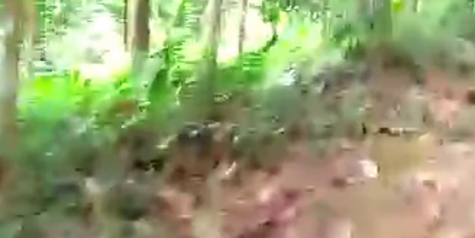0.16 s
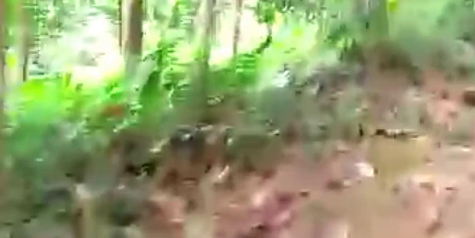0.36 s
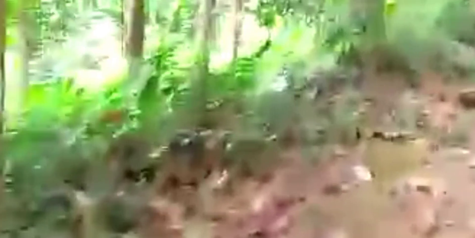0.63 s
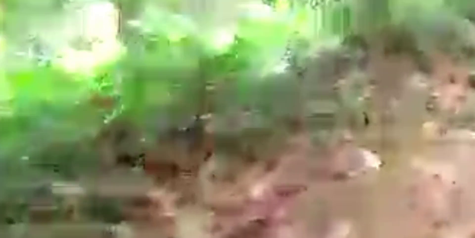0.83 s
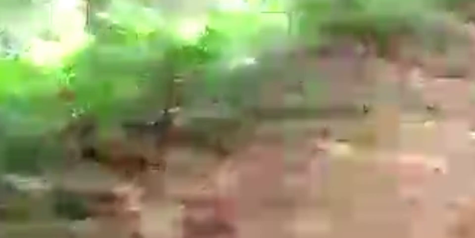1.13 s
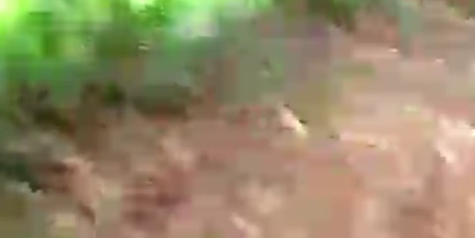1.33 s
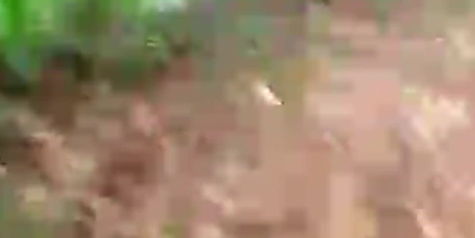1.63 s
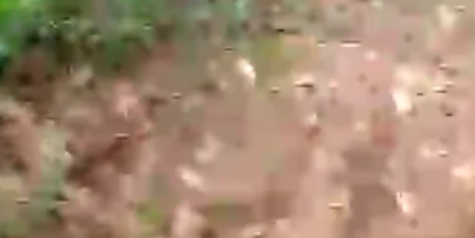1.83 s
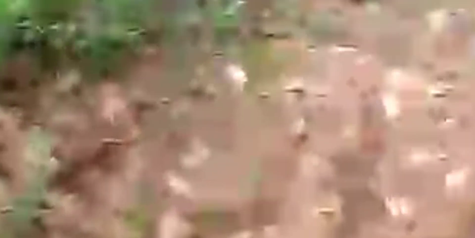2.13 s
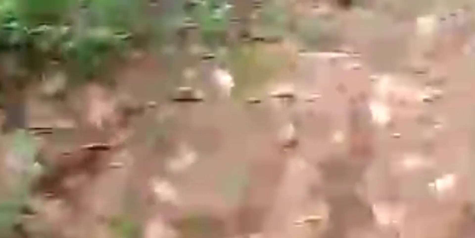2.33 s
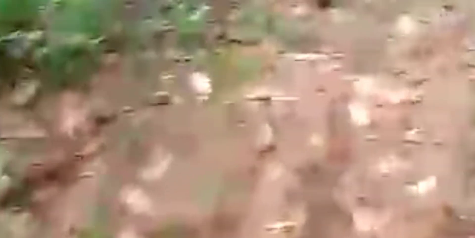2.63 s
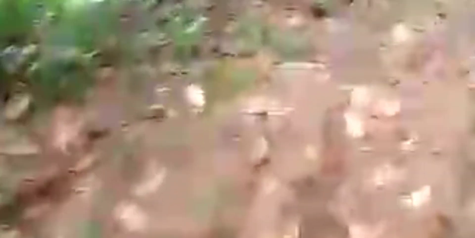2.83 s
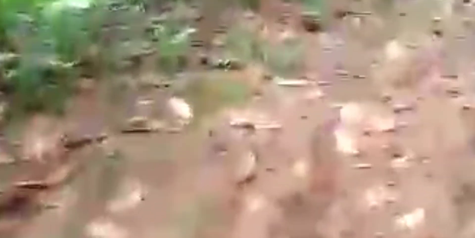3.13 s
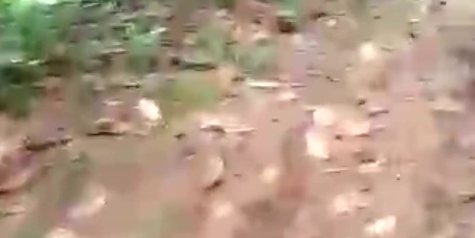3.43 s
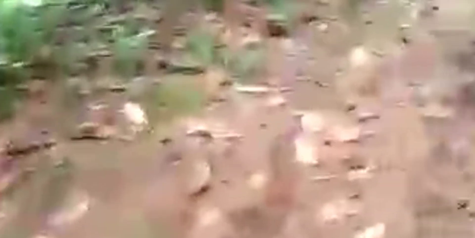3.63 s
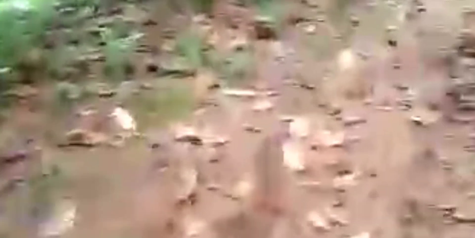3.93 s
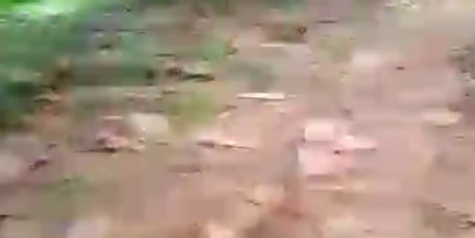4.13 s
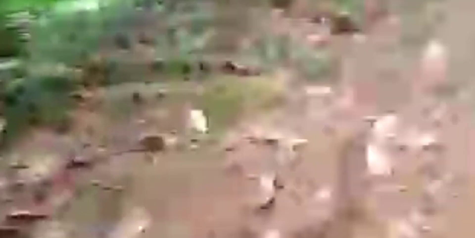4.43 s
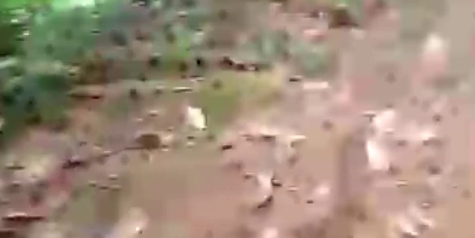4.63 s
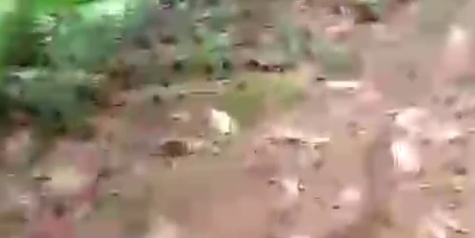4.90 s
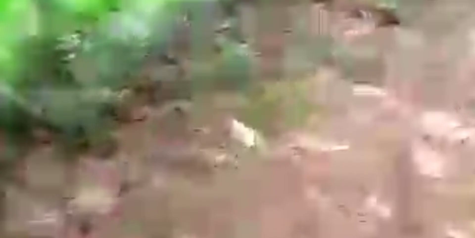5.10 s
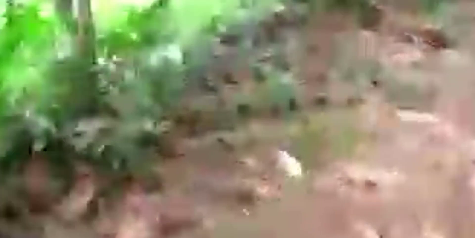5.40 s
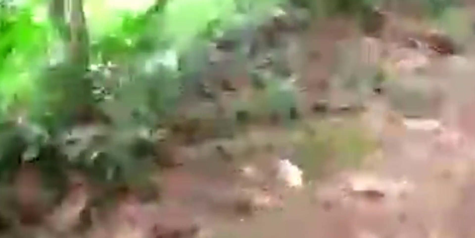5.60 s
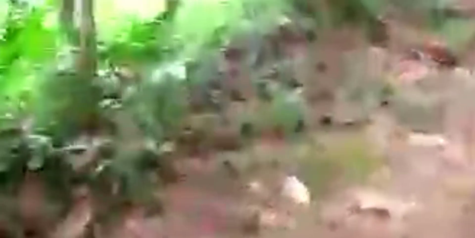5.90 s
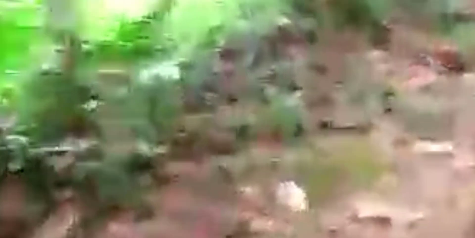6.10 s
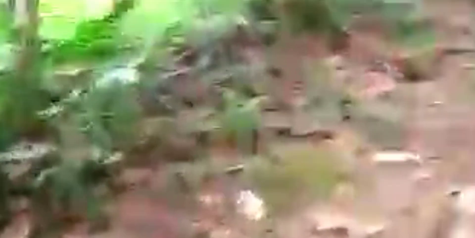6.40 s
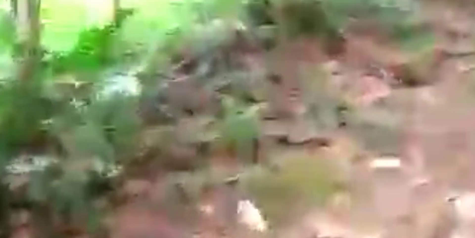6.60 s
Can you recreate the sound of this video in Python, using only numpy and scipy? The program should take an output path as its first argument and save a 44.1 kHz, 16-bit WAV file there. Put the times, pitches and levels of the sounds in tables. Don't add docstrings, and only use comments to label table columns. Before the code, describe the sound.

Birdsong among echoing trees: two loud falling whistles, growing upward whip notes, a quick even trill, scattered pips and burry warbles over faint hiss.

```python
import sys
import numpy as np
from scipy import signal
from scipy.fft import rfft, irfft, next_fast_len
from scipy.io import wavfile
from scipy.ndimage import uniform_filter1d

SR = 44100
rng = np.random.default_rng(int(sys.argv[2]) if len(sys.argv) > 2 else 0)


def generate_wav(signal):
    frames = np.transpose(np.atleast_2d(signal))
    scaled = np.clip(frames, -1, 1) * 32767
    pcm = np.round(scaled).astype(np.int16)
    wavfile.write(sys.argv[1], SR, pcm)


def level_to_linear(level):
    exponent = np.asarray(level, float) / 20
    return 10 ** exponent


N = 297675
LEAD_S = 0.7


def silence():
    return np.zeros(N + int(LEAD_S * SR))


def add(track, start_s, sound):
    at = int((start_s + LEAD_S) * SR)
    track[at:at + len(sound)] += sound[:len(track) - at]


def tone(hz, gain):
    phase = 2 * np.pi * np.cumsum(hz) / SR
    return np.sqrt(2) * gain * np.sin(phase)


def wander(length, rate):
    k = max(int(SR / rate), 1)
    x = rng.standard_normal(length + 2 * k)
    x = uniform_filter1d(uniform_filter1d(x, k), k)[k:k + length]
    return x / np.sqrt(2 / 3 / k)


def swell(length, rise):
    u = np.linspace(0, 1, length)
    return np.sin(np.pi / 2 * np.minimum(u / rise, 1)) * np.cos(np.pi / 2 * u ** 2)


def noise(colour, db, alike_hz):
    hz = np.maximum(np.arange(N // 2 + 1) * SR / N, 1)
    colour_hz, colour_db = np.transpose(colour)
    gain = level_to_linear(np.interp(np.log(hz), np.log(colour_hz), colour_db))
    alike = 1 / (1 + (hz / alike_hz) ** 3.7)
    balance = np.sqrt([1 + alike, 1 - 0.96 * alike])
    mid, side = irfft(rfft(rng.standard_normal((2, N))) * gain * balance, N)
    return np.array([mid + side, mid - side]) * level_to_linear(db) / np.sqrt(np.mean(mid ** 2))


def garden():
    # pitch_hz [Hz], level_db [dB per Hz]
    garden_colour = [(15, -89), (25, -24), (82, -13.5), (140, -7), (241, -5), (308, -8), (480, -10.5),
                     (911, -15), (1060, -13.5), (1220, -13.5), (2500, -18), (2970, -17), (9000, -38.5),
                     (11700, -66.5), (19800, -120)]
    # pitch_hz [Hz], level_db [dB per Hz]
    hiss_colour = [(3000, -28.5), (8000, -13), (11000, -10), (15700, -9)]
    traffic = noise(garden_colour, -54.5, alike_hz=330) * level_to_linear(0.6 * wander(N, 1.5))
    hiss = noise(hiss_colour, -71.5, alike_hz=50) * level_to_linear(0.59 * wander(N, 6))
    return traffic + hiss


def trees(track, pan_db, lag, near_db, far_db, near_t60=0.16, far_t60=1.285, echo_s=0.065, echo_db=-40):
    t = np.arange(int(1.2 * SR)) / SR

    def fading(t60, build_s):
        decay = np.exp(-np.log(1000) * t / t60) * (1 - np.exp(-t / build_s))
        return decay / np.sqrt(np.sum(decay ** 2))

    chance = rng.standard_normal((5, len(t)))
    aimed = level_to_linear(near_db) * fading(near_t60, 0.004) * (0.63 * chance[0] + 1.5 * chance[1:3])
    aimed[:, 0] += 1
    aimed[:, int(echo_s * SR)] += level_to_linear(echo_db)
    tail = level_to_linear(far_db) * fading(far_t60, 0.03) * chance[3:]

    sung = np.flatnonzero(track)
    first, last = sung[0], sung[-1]
    size = next_fast_len(last - first + len(t) + 99)
    hz = np.arange(size // 2 + 1) * SR / size
    side = np.array([[0.5], [-0.5]])
    shade_db = side * pan_db / (1 + (1480 / (hz + 1)) ** 3)
    delay = np.exp(2j * np.pi * hz * (side * lag - 20) / SR)
    wood = 1 / (1 + (650 / (hz + 1)) ** 4) / (1 + (hz / 5000) ** 2)
    reply = rfft(aimed, size) * level_to_linear(shade_db) * delay
    reply = reply + rfft(tail, size) * level_to_linear(0.38 * shade_db) * wood
    out = np.zeros((2, len(track) + size))
    out[:, first:first + size] = irfft(rfft(track[first:last], size) * reply, size)
    return out[:, len(track) - N:len(track)]


def chips(rows, flutter_hz, rise):
    track = silence()
    for start_s, length_s, start_hz, end_hz, db in rows:
        u = np.linspace(0, 1, int(length_s * SR))
        hz = end_hz + (start_hz - end_hz) * (1 - u) ** 1.9
        hz = hz + flutter_hz * wander(len(u), 200 + 1.3 * flutter_hz)
        add(track, start_s, tone(hz, level_to_linear(db) * swell(len(u), rise)))
    return track


def sagging(rows, sag):
    return [(start_s, length_s, hz, hz * (1 - sag), db) for start_s, length_s, hz, db in rows]


def harsh_birds():
    # start_s [s], length_s [s], start_hz [Hz], level_db [dB]
    rasps = [(-.1, 0.24, 4700, -61.5), (.23, 0.14, 7900, -70), (.88, 0.064, 5816, -60.5),
             (1.125, 0.044, 5900, -62), (1.92, 0.06, 6430, -62), (2.37, 0.093, 5840, -57),
             (2.98, 0.047, 6060, -60), (3.57, .13, 3535, -56), (3.92, .10, 5164, -52),
             (3.93, 0.16, 8120, -72), (4.14, .11, 5180, -53), (4.15, 0.1, 7900, -71),
             (5.51, 0.084, 6000, -58), (5.855, 0.069, 5750, -52.5), (5.855, 0.082, 8400, -71),
             (6.13, 0.059, 6160, -61)]
    # start_s [s], length_s [s], start_hz [Hz], end_hz [Hz], level_db [dB]
    flicks = [(.16, 0.016, 2880, 4600, -51.5), (1.53, 0.043, 4750, 5600, -60.5),
              (2.25, 0.11, 3720, 1810, -57.5), (2.45, 0.012, 3950, 3170, -50),
              (2.742, 0.01, 7650, 5700, -48.5), (2.742, 0.0095, 5580, 4170, -53.5),
              (2.94, .013, 4140, 3110, -54.5), (3.52, 0.032, 5550, 4920, -55.5),
              (4.555, .014, 5880, 5100, -58.5), (5.155, 0.049, 6380, 6910, -57),
              (5.155, 0.051, 7600, 8380, -62), (6.17, 0.064, 2980, 1880, -58),
              (6.69, 0.039, 4000, 3660, -56.5), (2.203, .004, 12000, 8600, -69),
              (2.755, .025, 5600, 8200, -66), (4.915, .05, 5420, 5230, -58),
              (5.36, 0.15, 5260, 5230, -60.5)]
    return chips(sagging(rasps, 0.12), flutter_hz=810, rise=0.13) + chips(flicks, flutter_hz=45, rise=0.043)


def burry_birds():
    # start_s [s], length_s [s], start_hz [Hz], level_db [dB]
    cheeps = [(1.15, 0.042, 5150, -59.5), (1.80, .066, 5100, -68), (2.44, .31, 3310, -56.5),
              (2.76, 0.017, 6340, -60), (4.50, .053, 6750, -71), (4.71, 0.015, 6400, -59.5),
              (4.76, 0.055, 7420, -68), (5.02, 0.038, 4580, -66), (5.065, 0.031, 7720, -70),
              (5.33, 0.31, 5900, -61), (6.55, .15, 5450, -70.5)]
    # start_s [s], length_s [s], start_hz [Hz], end_hz [Hz], level_db [dB]
    warbles = [
        (-.12, .21, 2890, 2514, -48),
        (2.01, 0.096, 5620, 5750, -56.5),
        (2.16, 0.092, 5945, 5200, -55.5),
        (2.30, 0.17, 4600, 4000, -55.5),
        (3.44, 0.053, 7460, 7100, -55.5),
        (5.62, 0.22, 3793, 3016, -49),
        (5.69, .17, 4600, 4000, -58),
        (5.85, .43, 3314, 2818, -55),
        (6.28, .15, 2606, 1472, -59.5),
    ]
    # start_s [s], length_s [s], start_hz [Hz], end_hz [Hz], level_db [dB]
    song = [
        (2.56, .19, 4400, 4040, -60),
        (5.92, .22, 4175, 4015, -51),
        (6.20, .20, 4105, 4390, -50),
        (6.51, .21, 4290, 4085, -51.5),
    ]
    burry = chips(sagging(cheeps, 0.061), flutter_hz=131, rise=0.11)
    burry = burry + chips(warbles, flutter_hz=240, rise=0.05)
    return burry + chips(song, flutter_hz=110, rise=0.18)


def pips():
    pip_calls = [
        (.25, 0.59, 1849, 1810, -51.5),
        (3.015, .037, 833, 1430, -53),
        (3.188, 0.082, 2184, 2290, -43),
        (3.22, 0.03, 1154, 1080, -54.5),
        (3.245, .029, 894, 822, -56),
        (3.283, .03, 1920, 1815, -45),
        (4.52, 0.034, 2200, 2100, -54),
        (4.945, 0.043, 2130, 2130, -53),
        (5.14, 0.074, 5900, 5796, -49.5),
        (6.0, 0.45, 1795, 1756, -62.5),
    ]
    return chips(pip_calls, flutter_hz=5.9, rise=0.1)


def whistle(track, rows, throat, rough):
    s, hz, db = np.transpose(rows)
    t = np.arange(s[0], s[-1], 1 / SR)
    hz = uniform_filter1d(np.interp(t, s, hz), 400)
    hz = hz * (1 + rough * wander(len(t), 74.5))
    gain = level_to_linear(np.interp(t, s, db)) * signal.windows.tukey(len(t), 0.06)
    gain *= 1 + 0.81 * np.sin(2 * np.pi * 31.46 * t) / (1 + (hz / 1240) ** 12)
    out = tone(hz, gain)
    for k, modes in enumerate(throat, 2):
        share = sum(level_to_linear(top_db) / (1 + (2 * (k * hz - mid_hz) / width_hz) ** 4)
                    for mid_hz, width_hz, top_db in modes)
        unsteady = level_to_linear(3.5 * wander(len(t), 70))
        out += tone(k * hz, gain * share * unsteady)
    add(track, s[0], out)
    return track


def held(rows, rough, unsteady_db):
    track = silence()
    for start_s, length_s, start_hz, end_hz, db in rows:
        u = np.arange(0, 1, 0.005 / length_s)
        flicker = wander(int(length_s * SR), 29.5)
        flicker_db = unsteady_db * flicker[(u * length_s * SR).astype(int)]
        hz = end_hz + (start_hz - end_hz) * np.exp(-u / 0.23)
        points = np.transpose([start_s + u * length_s, hz, db - 2.5 * u + flicker_db])
        whistle(track, points, [], rough)
    return track


def thin_notes():
    # start_s [s], length_s [s], start_hz [Hz], end_hz [Hz], level_db [dB]
    clear = [
        (0.384, 0.2, 3417, 2930, -45.5),
        (0.564, .18, 3003, 2874, -47.5),
        (4.247, .5, 3567, 3567, -65),
    ]
    # start_s [s], length_s [s], start_hz [Hz], end_hz [Hz], level_db [dB]
    husky = [
        (5.02, .11, 3950, 3820, -61),
        (5.17, .08, 3850, 3760, -58),
        (5.27, .21, 3780, 3700, -55),
        (5.51, .11, 3720, 3680, -56),
    ]
    return held(clear, rough=0.0042, unsteady_db=2) + held(husky, rough=0.02, unsteady_db=4)


def trill():
    # start_s, a moment within the low part, just after the note sets in [s], level_db [dB]
    trill_notes = [(3.642, -45), (3.742, -44), (3.847, -42.5), (3.950, -41.5), (4.053, -41), (4.158, -40.5),
                   (4.26, -40.5), (4.365, -42.5), (4.479, -40.5), (4.59, -41.5), (4.691, -41.5),
                   (4.801, -43), (4.908, -39.5), (5.018, -40.5), (5.134, -40), (5.245, -44)]
    low_hz, top_hz = 2290, 2684
    track = silence()
    for (start_s, db), step_s in zip(trill_notes, np.linspace(0.037, 0.066, len(trill_notes))):
        t = np.arange(0, 1.345 * step_s, 1 / SR)
        climb = np.sin(np.pi / 2 * np.minimum(t / step_s, 1) ** 1.223) ** 2
        hz = low_hz + (top_hz - low_hz) * climb
        add(track, start_s - 0.33 * step_s, tone(hz, level_to_linear(db) * swell(len(t), rise=0.13)))
    return track


def whips():
    # middle_s, when the pitch passes its middle [s], length_s [s], level_db [dB]
    whip_notes = [
        (1.513, 0.062, -54.5),
        (1.726, 0.08, -51.5),
        (1.951, 0.091, -47.5),
        (2.179, .08, -44),
        (2.401, 0.094, -41.5),
        (2.636, 0.098, -40),
        (2.877, 0.1026, -39.5),
        (3.122, 0.11, -39.5),
        (3.365, 0.096, -38.5),
    ]
    low_hz, mid_hz, top_hz = 1449, 2470, 3087
    lead_s, leap_s = 0.012, 0.8 * 0.0175
    span_hz = top_hz - low_hz
    track = silence()
    for middle_s, length_s, db in whip_notes:
        t = np.arange(0, length_s + lead_s, 1 / SR) - 0.3 * length_s - lead_s
        hz = low_hz + span_hz * ((mid_hz - low_hz) / span_hz) ** np.exp(-t / leap_s)
        hz = hz * (1 + 0.015 * rng.standard_normal())
        add(track, middle_s + t[0], tone(hz, level_to_linear(db) * swell(len(t), rise=0.52) ** 2.32))
    return track


def slider(over, under, throat):
    track = whistle(silence(), over, throat, rough=0.00221)
    return whistle(track, under, [], rough=0.0019)


def first_slide():
    # time_s [s], pitch_hz [Hz], level_db [dB]
    slide_start = [(-.34, 2850, -50), (-.08, 2150, -39),
                   (0.0, 1856, -27.5), (.204, 1478, -28.5), (.288, 1272, -34), (.33, 1006, -38),
                  (.385, 857, -42.5), (.6, 755, -48.5), (.84, 638, -55)]
    # time_s [s], pitch_hz [Hz], level_db [dB]
    lower_voice = [(-.2, 1500, -33.5), (-.1, 1157, -47.5), (0.018, 900, -49), (0.141, 816, -73)]
    # middle_hz [Hz], width_hz [Hz], level_db under the whistle [dB]
    resonances = [
        [(2213, 586, 1.2), (3740, 800, -32)],
        [(4000, 610, -19.5), (5550, 800, -37)],
        [(5900, 1600, -36)],
        [(8800, 1300, -45)],
    ]
    return slider(slide_start, lower_voice, resonances)


def second_slide():
    # time_s [s], pitch_hz [Hz], level_db [dB]
    slide_path = [(3.28, 2854, -49), (3.332, 2580, -44), (3.524, 2212, -34.5), (3.578, 1975, -31),
                  (3.826, 1582, -30), (4.0, 1332, -29), (4.066, 1139, -33), (4.15, 813, -40.5),
                  (4.34, 683, -57)]
    # time_s [s], pitch_hz [Hz], level_db [dB]
    lower_voice = [(3.55, 1819, -55), (3.58, 1443, -37), (3.669, 1064, -43), (3.77, 893, -57),
                   (3.819, 873, -68)]
    # middle_hz [Hz], width_hz [Hz], level_db under the whistle [dB]
    resonances = [
        [(3900, 460, -28), (4600, 640, -31.5), (5490, 820, -20.5)],
        [(4500, 610, -31)],
    ]
    return slider(slide_path, lower_voice, resonances)


def scene():
    return (garden()
            + trees(harsh_birds(), pan_db=-1.0, lag=15.6, near_db=-1.35, far_db=11.5, near_t60=0.15, far_t60=0.68)
            + trees(burry_birds(), pan_db=3.0, lag=-10, near_db=-1.2, far_db=4.0, near_t60=0.51, far_t60=1.0)
            + trees(pips(), pan_db=-3.0, lag=12.9, near_db=-5, far_db=-4.0)
            + trees(thin_notes(), pan_db=2.0, lag=9.1, near_db=-3.5, far_db=0.0)
            + trees(trill(), pan_db=11.0, lag=26.7, near_db=-4.0, far_db=3.5)
            + trees(whips(), pan_db=-11.5, lag=-30, near_db=-5, far_db=4.0, near_t60=0.21,
                    echo_s=0.037, echo_db=-3.0)
            + trees(first_slide(), pan_db=10.0, lag=26.7, near_db=-5, far_db=0.0)
            + trees(second_slide(), pan_db=14.5, lag=28.4, near_db=-5, far_db=-1.5))


def band_limit(x):
    return signal.sosfilt(signal.butter(12, 16800, fs=SR, output="sos"), x)


def record(dry):
    top_cut = signal.ellip(12, 0.2, 80, 15730, fs=SR, output="sos")
    mix = signal.sosfilt(top_cut, dry)
    return band_limit(mix)


dry = scene()
out = record(dry)
generate_wav(out)
```